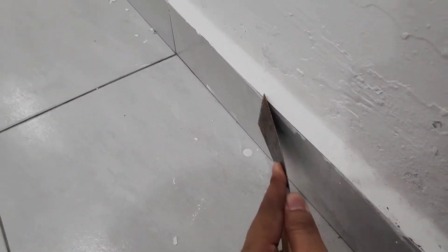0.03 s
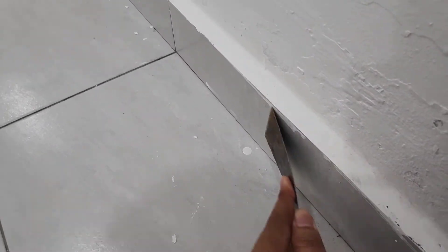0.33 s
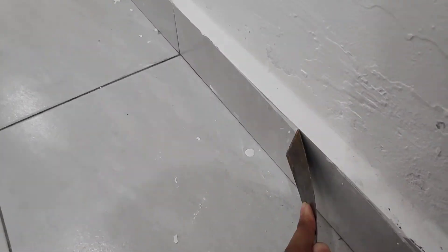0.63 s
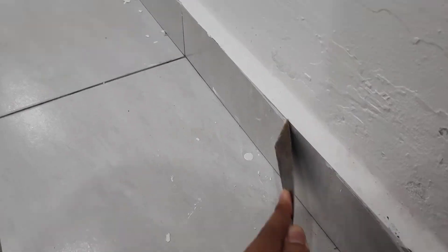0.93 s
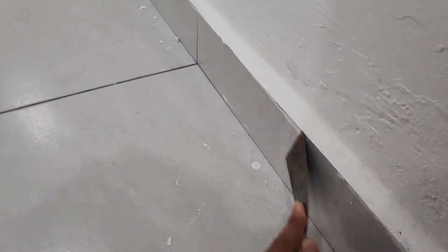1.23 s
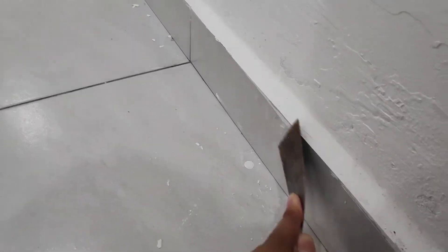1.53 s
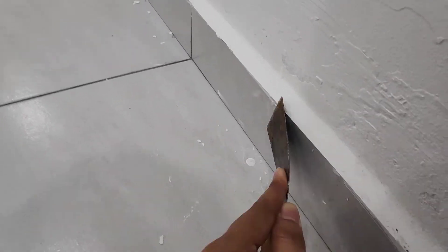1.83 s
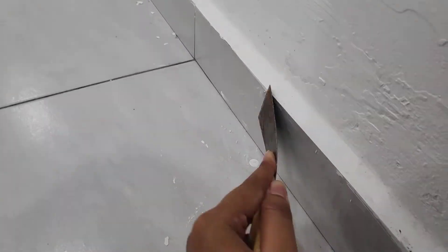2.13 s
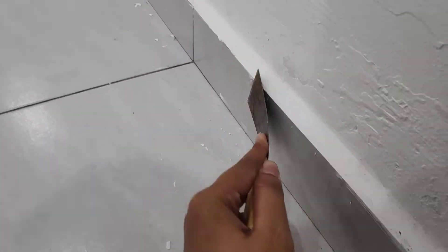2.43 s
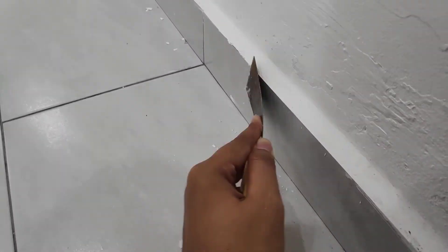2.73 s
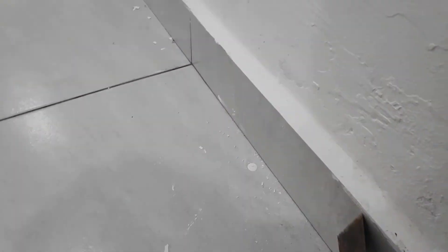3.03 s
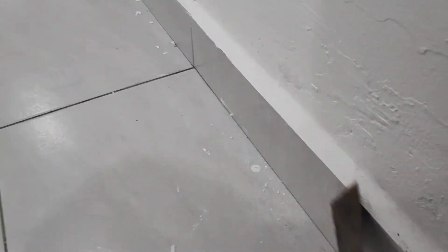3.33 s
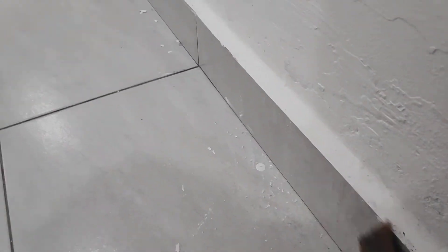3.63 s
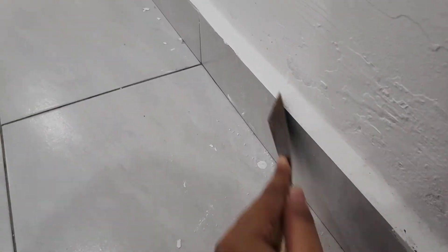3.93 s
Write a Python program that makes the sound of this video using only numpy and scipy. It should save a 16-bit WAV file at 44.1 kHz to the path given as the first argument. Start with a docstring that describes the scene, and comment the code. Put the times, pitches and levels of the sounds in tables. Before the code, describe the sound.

A steel putty knife scrapes paint off tile skirting in quick, raspy strokes with a faint metallic ring. The strokes grow louder halfway, pause briefly, then resume. The bare room reverberates over low background noise and soft microphone handling rumble.

```python
"""Scraping paint off a tile skirting

A steel putty knife scrapes the edge about seven times a second. Grit sticks and slips under it,
and these impulses excite the resonances of the hand-damped blade. Floor and wall return early
reflections, and the bare tiled room adds reverberation. Beneath lie a low background noise
and the rumble of a hand-held microphone."""
import sys
import numpy as np
from scipy import signal
from scipy.fft import rfft, irfft, next_fast_len
from scipy.io import wavfile

SR = 44100
rng = np.random.default_rng(int(sys.argv[2]) if len(sys.argv) > 2 else 0)


def generate_wav(sig):
    """Save sig (samples, or channels by samples) to the path in sys.argv[1] as 16-bit PCM at SR."""
    pcm = np.round(np.clip(np.atleast_2d(sig).T, -1, 1) * 32767).astype(np.int16)
    wavfile.write(sys.argv[1], SR, pcm)


N = 176400
STEEL_HZ = 3004  # the blade's narrow ring, which outlasts the strokes


def amp(db):
    """Amplitude ratio of a level in decibels."""
    return 10 ** (np.asarray(db) / 20)


def unit(x):
    """Normalisation to an rms of 1."""
    return x / np.sqrt(np.mean(x ** 2) + 1e-20)


def read(points, hz):
    """Interpolation of a table on a logarithmic frequency axis."""
    f, value = np.transpose(points)
    return np.interp(np.log(hz + 1), np.log(f + 1), value)


def colour(x, gain):
    """Zero-phase filtering by a gain that is a function of frequency."""
    return irfft(rfft(x, 2 * N) * gain(np.fft.rfftfreq(2 * N, 1 / SR)))[..., :N]


def wobble(top_hz):
    """Random fluctuation: low-passed noise of rms 1."""
    return unit(colour(rng.standard_normal(N), lambda f: 1 / np.sqrt(1 + (f / top_hz) ** 4)))


def add(mix, start, sound):
    """Superposition of a sound on the mix, from a given sample on."""
    part = mix[:, start:start + sound.shape[1]]
    part += sound[:, :part.shape[1]]


def scraping(slips_per_s=7000, spread_db=2.5, chatter_db=1, chatter_hz=223):
    """Stick-slip friction: each stroke swells and fades a stream of tiny impulses on the blade."""
    # knife strokes: (peak time [s], rise [s], fall [s], level [dB], lowest resonance [Hz],
    # its boost [dB], spectral tilt [dB/octave], boost of the pair near 6 kHz [dB])
    strokes = [(0.018, 0.11, 0.039, -26.5, 2710, 1.5, -1, -6.5),
               (.135, 0.028, 0.035, -31, 2330, 10.5, 3, 3.5), (.195, 0.036, 0.021, -27, 2670, 11, 4, 0),
               (.303, 0.034, 0.036, -31, 2880, -1, 0.5, -3.5),
               (0.458, 0.044, 0.052, -26.5, 2960, -4, 0.5, -1.5),
               (0.611, 0.036, 0.035, -35, 3040, 4, 4.5, 2), (.795, 0.041, 0.02, -31, 2890, -7, 1.5, 2),
               (0.923, 0.044, 0.056, -30, 2830, -3, 0, -2),
               (1.126, 0.069, 0.036, -35.5, 2870, 0.5, 1.5, -2),
               (1.272, 0.047, 0.029, -32, 2850, -2, 0.5, -1.5),
               (1.407, 0.043, 0.033, -30.5, 3020, -9, 0, -2.5),
               (1.544, 0.037, 0.034, -31, 3010, -4, 1.5, -0.5),
               (1.692, 0.041, 0.032, -27.5, 3140, -4, 2, -1.5),
               (1.813, 0.035, 0.037, -21.5, 2760, -3, 1.5, -1.5),
               (1.981, 0.051, 0.028, -24, 2790, -6.5, 1, -1.5),
               (2.115, 0.048, 0.039, -20.5, 2930, -1, 2, -0.5),
               (2.272, 0.054, 0.033, -28, 3120, -10, -1, -7.5),
               (2.41, 0.046, 0.045, -21, 3120, -8, 0.5, -5),
               (2.568, 0.047, 0.035, -23.5, 3120, -5.5, -0.5, -3.5),
               (2.71, 0.044, 0.044, -19.5, 2900, -3.5, 1.5, -3),
               (2.869, 0.048, 0.053, -17.5, 3120, -7.5, 2.5, 1),
               (2.931, 0.032, 0.042, -15.5, 2940, -20, 7, 2),
               (2.975, 0.03, 0.022, -19.5, 3080, -29, 7.5, -1.5),
               (3.069, 0.088, 0.076, -34, 2850, -3.5, -0.5, -2),
               (3.242, 0.058, 0.037, -21.5, 2790, -6.5, 1, 3),
               (3.367, 0.035, 0.036, -22.5, 3000, -9, 0.5, 4.5),
               (3.504, 0.046, 0.035, -21, 2880, -4, 2.5, 3), (3.635, 0.04, 0.03, -18.5, 2860, -0.5, 5, 6.5),
               (3.67, 0.015, 0.027, -18.5, 2330, 6.5, 6, 3), (3.828, 0.071, 0.072, -19, 2790, -2, 4, 2),
               (3.98, 0.11, 0.098, -22, 2860, -5.5, -0.5, -6)]
    t, out = np.arange(N) / SR, np.zeros((2, N))
    slips = (rng.random(N) < slips_per_s / SR) * rng.choice([-1, 1], N)
    size_db = spread_db * np.minimum(rng.exponential(1, N), 3)
    grit = unit(slips * amp(size_db + chatter_db * wobble(chatter_hz)))
    for peak, rise, fall, db, *tone in strokes:
        span = np.flatnonzero(abs(t - peak) < .2)
        offset = t[span] - peak
        width = np.where(offset < 0, rise, fall)
        push = amp(db) * np.exp(-abs(offset / width) ** 2.64)  # a flat-topped bell
        add(out, span[0], blade(early_reflections(grit[span] * push), *tone))
    return out


def early_reflections(force, echo_db=-0.5, echo_s=.0012, scatter_db=1, scatter_s=0.0026):
    """Interference of direct sound, a skirting echo of random delay and scatter off floor and wall."""
    size = next_fast_len(len(force) + 1024)
    f = np.fft.rfftfreq(size, 1 / SR)
    delay = lambda s: np.exp(-2j * np.pi * f * s)
    direct = delay(np.array([[0.00021], [0]]))  # the right microphone is nearer
    echo = amp(echo_db) * delay(echo_s * (.5 + rng.random((2, 1))))
    coherent = irfft(rfft(force, size) * (direct + echo), size)
    decay = np.exp(-1 / (scatter_s * SR))
    energy = signal.lfilter([1 - decay], [1, -decay], np.pad(force, (0, size - len(force))) ** 2)
    scatter = amp(scatter_db) * np.sqrt(energy) * rng.standard_normal((2, size))
    return (coherent + scatter) / np.sqrt(1 + amp(scatter_db) ** 2 + amp(echo_db) ** 2)


def blade(x, low_hz, low_db, tilt_db, ring_db, grip_shift=.018, grip_db=1.5):
    """Damped resonance: broad modes stand over a rasp; the grip shifts the upper ones at random."""
    # higher blade resonances: (frequency [Hz], width [Hz], relative level [dB])
    upper_modes = [(4430, 630, -1), (7690, 590, -7.5), (8480, 1060, -0.5), (9780, 990, -4),
                   (11120, 1000, 3.5), (13530, 810, 2)]
    # the blade's strongest pair of resonances: (frequency [Hz], width [Hz], relative level [dB])
    ring_pair = [(5697, 640, 0.5), (6303, 450, 1)]
    # broad spectrum of the scrape: (frequency [Hz], relative level [dB])
    rasp = [(200, -31), (1000, -22), (1600, -14.5), (2100, -10.5), (2450, 1.5), (3100, 2), (3450, 0),
            (3850, 1), (5000, 2), (7000, 2), (9500, -5), (12500, -0.5), (14000, -4.5)]
    f = np.fft.rfftfreq(x.shape[1], 1 / SR)
    bell = lambda hz, width: 1 / (1 + ((f - hz) / width) ** 2) ** 4
    power = amp(-10.5) ** 2 + amp(5.5 + low_db) ** 2 * bell(low_hz, 295)  # flat floor and lowest mode
    for hz, width, db in upper_modes + [(hz, width, db + ring_db) for hz, width, db in ring_pair]:
        shift, load = rng.uniform(-1, 1, 2)
        power = power + amp(db + grip_db * load) ** 2 * bell(hz * (1 + grip_shift * shift), width)
    octaves = np.log2(np.maximum(f, low_hz) / low_hz)
    gain = random_notches(f) * np.sqrt(power) * amp(read(rasp, f) + tilt_db * octaves)
    return irfft(rfft(x) * unit(gain), x.shape[1])


def random_notches(f, count=4, depth_db=-8.5, relative_width=0.022):
    """Notch filtering: a few narrow dips at random frequencies colour each stroke differently."""
    centres = np.exp(rng.uniform(np.log(2300), np.log(9500), (count, 1)))
    return amp(depth_db * np.exp(-((f / centres - 1) / relative_width) ** 2).max(0))


def shifting_contact(x, flare_db=3, drift_db=0.97):
    """Time-varying coupling: the contact feeds now one narrow band of the blade, now another."""
    hz, t, spectrum = signal.stft(x, SR, nperseg=256, noverlap=192)
    bell = lambda axis, width: np.exp(-((axis - axis.mean()) / width) ** 2 / 2)

    def patches(width_hz, width_s):
        kernel = np.outer(bell(hz, width_hz), bell(t, width_s))
        return unit(signal.fftconvolve(rng.standard_normal(spectrum.shape[1:]), kernel, "same"))

    flares = flare_db * patches(width_hz=76, width_s=.006)  # stick and slip
    drift = drift_db * patches(width_hz=97, width_s=.04)  # the contact wanders along the edge
    return signal.istft(spectrum * unit(amp(flares + drift)), SR, nperseg=256, noverlap=192)[1][:, :N]


def steel_response(f, ring_db=5.5, width_hz=20):
    """Resonance and weak radiation: the blade's one narrow peak and two constant hollows."""
    # bands where the blade radiates poorly: (frequency [Hz], width [Hz], gain [dB])
    hollows = [(1980, 82, -16.5), (3375, 48, -9)]
    ring = 1 + (amp(ring_db) - 1) / (1 + 2j * (f - STEEL_HZ) / width_hz)
    return ring * amp(sum(db * np.exp(-((f - hz) / width) ** 2) for hz, width, db in hollows))


def singing(width_hz=33):
    """Forced vibration: light friction keeps the lowest mode ringing between strokes."""
    # envelope of the ring: (time [s], level [dB])
    envelope = [(0, -51), (.3, -47), (0.479, -44), (.72, -65), (.95, -46.5), (1.2, -54.5), (1.4, -62),
                (3.2, -57), (3.9, -40)]
    ring = colour(rng.standard_normal((2, N)), lambda f: 1 / (1 + ((f - STEEL_HZ) / width_hz) ** 2))
    return unit(ring) * amp(np.interp(np.arange(N) / SR, *np.transpose(envelope)))


def room(x, level_db=-7):
    """Reverberation: hard walls sustain a diffuse tail that dies sooner in the treble."""
    # decay of the tiled room: (frequency [Hz], time to fall by 60 dB [s])
    t60 = [(500, 1), (3000, 1), (6000, 0.59), (10000, 0.52), (15000, 0.41)]
    hz, t, noise = signal.stft(rng.standard_normal((2, SR)), SR, nperseg=256)
    decay = amp(-60 * t / read(t60, hz)[:, None])
    tail = signal.istft(noise * decay, SR, nperseg=256)[1]
    return amp(level_db) * signal.fftconvolve(x, tail / np.linalg.norm(tail[0]), axes=1)[:, :N]


def background(level_db=-48.5, pan_db=1.0):
    """Partial coherence: steady low room noise, nearly alike on both sides in the bass."""
    # room noise: (frequency [Hz], relative spectral density [dB])
    spectrum = [(20, 8), (60, -7.5), (120, -1.5), (180, 0), (250, -1), (330, -8.5), (550, -10), (760, -7),
                (1100, -13), (2000, -16), (5000, -19.5), (14000, -35)]
    # likeness of left and right: (frequency [Hz], correlation [ratio])
    coherence = [(40, 0.29), (130, 1), (220, 0.99), (400, 0.73), (700, .6), (1300, 0), (4000, 0)]
    left, independent = rng.standard_normal((2, N))
    shared = lambda f: np.clip(read(coherence, f), -1, 1)
    right = colour(left, shared) + colour(independent, lambda f: np.sqrt(1 - shared(f) ** 2))
    noise = unit(colour(np.array([left, right]), lambda f: amp(read(spectrum, f))))
    return amp(level_db) * noise * amp([[pan_db], [-pan_db]])


def handling(rumble_hz=60, rumble_db=-50, bump_s=0.031, left_db=-17):
    """Structure-borne sound: lumpy rumble of the hand-held microphone, mostly on the right."""
    # soft low bumps at the right microphone: (time [s], level [dB])
    bumps = [(.08, -46), (.19, -42), (.96, -37), (1.35, -42), (1.47, -38), (1.64, -41), (1.74, -49),
             (2.25, -38.5), (3.0, -43), (3.23, -42), (3.77, -43)]
    t = np.arange(N) / SR
    envelope = amp(rumble_db) + sum(amp(db) * np.exp(-((t - s) / bump_s) ** 2) for s, db in bumps)
    return envelope * wobble(rumble_hz) * amp([[left_db], [0]])


def catches(decay_s=0.0026):
    """Impulsive excitation: the edge catches on a lump and the blade gives a short snap."""
    # lumps under the edge: (time [s], level [dB], spectral tilt [dB/octave])
    lumps = [(.099, -20, 9), (0.45, -24, 0), (.737, -39, -10), (3.6095, -13, 0.5)]
    t, out = np.arange(SR // 20) / SR, np.zeros((2, N))
    for start, db, tilt_db in lumps:
        snap = amp(db) * np.exp(-t / decay_s) * rng.standard_normal((2, len(t)))
        add(out, round(start * SR), blade(snap, low_hz=3020, low_db=-2, tilt_db=tilt_db, ring_db=4))
    return out


def scene():
    """Superposition of knife, room and low noise at two differently shaded microphones."""
    # right microphone relative to the left: (frequency [Hz], gain [dB])
    shading = [(2000, -0.5), (3000, -4.5), (3800, 1), (4500, -6), (5200, -1), (5700, -3), (6700, 4),
               (8700, 2.5), (10200, -1.5), (11300, -5.5), (12700, -15), (14000, -8.5)]
    knife = colour(shifting_contact(scraping()) + catches(), steel_response) + singing()
    left, right = knife + room(knife)
    right = colour(right, lambda f: amp(read(shading, f)))
    return np.array([left, right]) + background() + handling()


def record(dry):
    """Band limiting: a steep low-pass filter removes the highest treble."""
    low_pass = signal.firwin(601, 14320, window=("kaiser", 8), fs=SR)
    return signal.oaconvolve(dry, low_pass[None], "same")


dry = scene()
out = record(dry)
generate_wav(out)
```